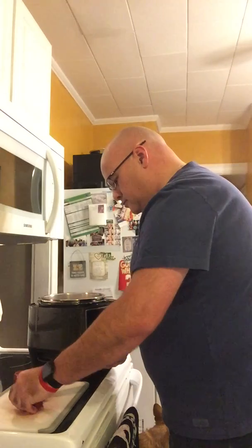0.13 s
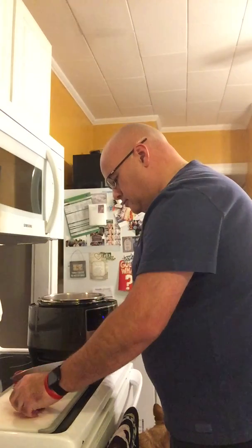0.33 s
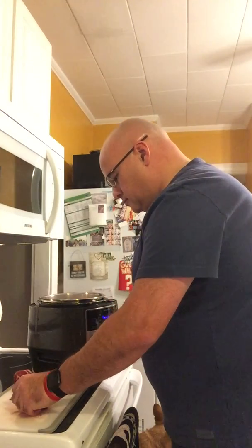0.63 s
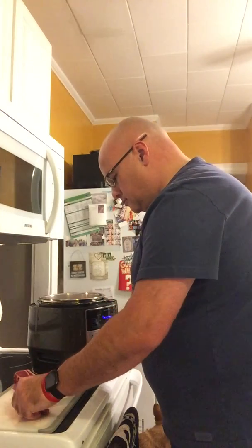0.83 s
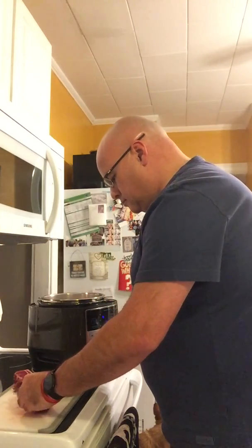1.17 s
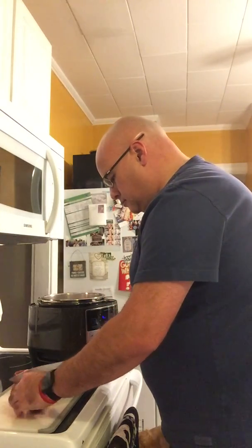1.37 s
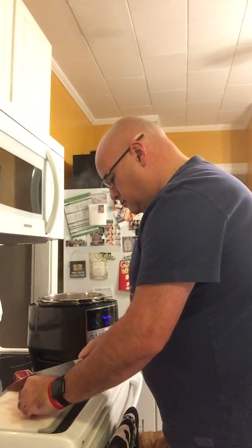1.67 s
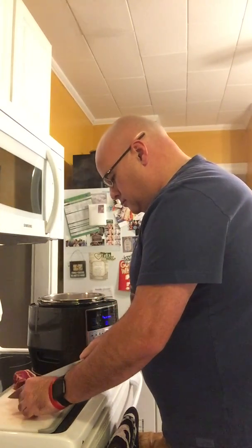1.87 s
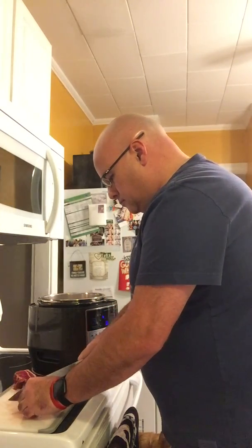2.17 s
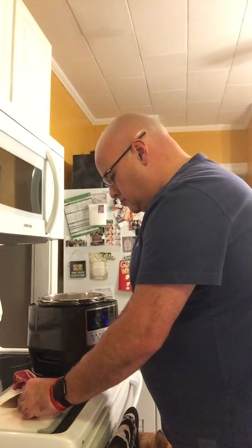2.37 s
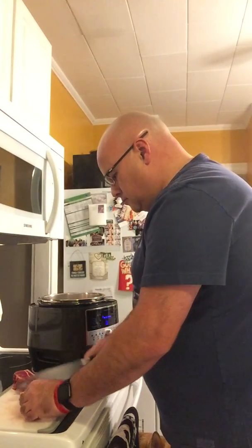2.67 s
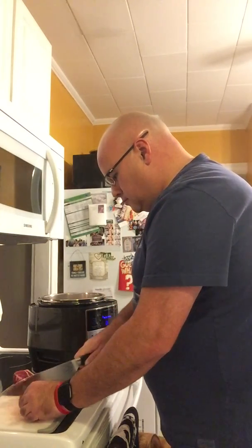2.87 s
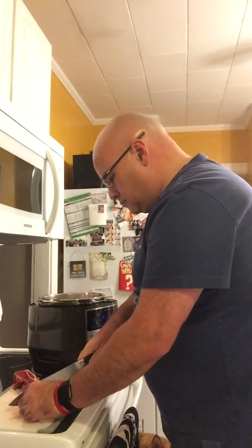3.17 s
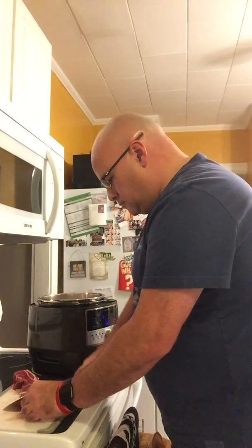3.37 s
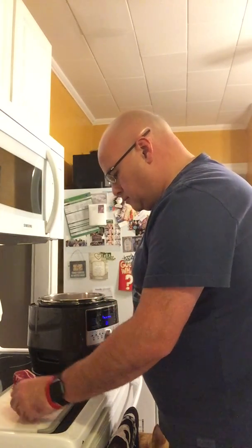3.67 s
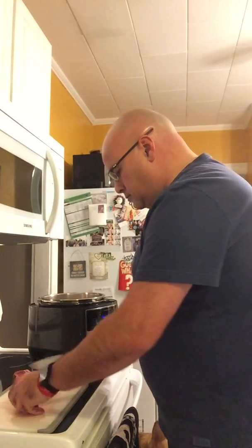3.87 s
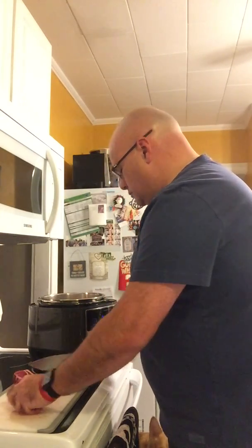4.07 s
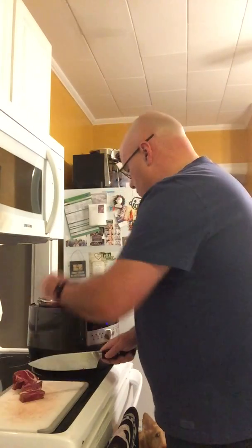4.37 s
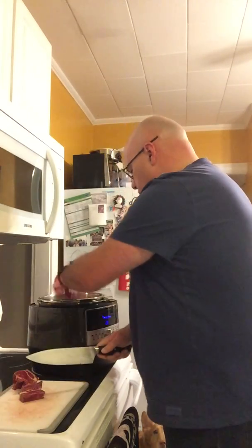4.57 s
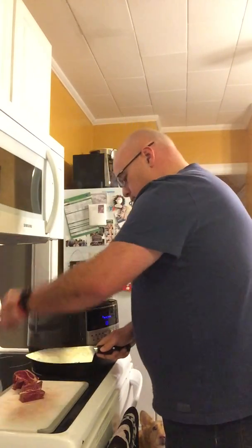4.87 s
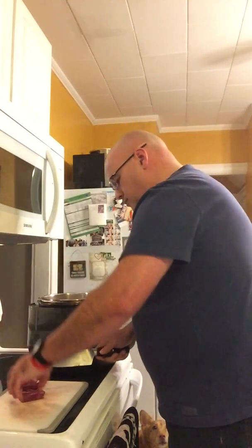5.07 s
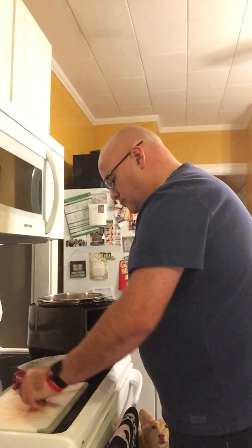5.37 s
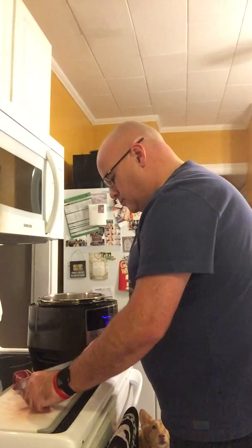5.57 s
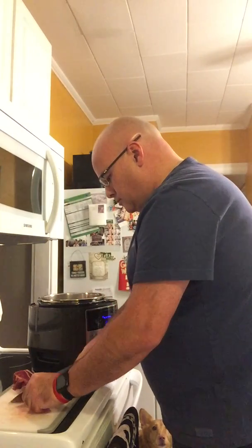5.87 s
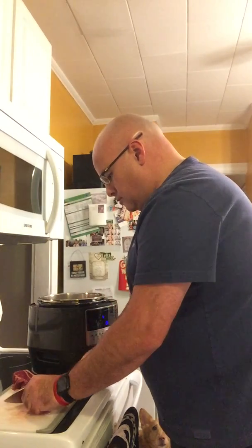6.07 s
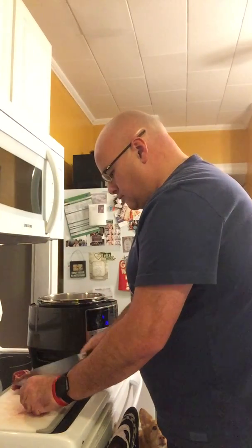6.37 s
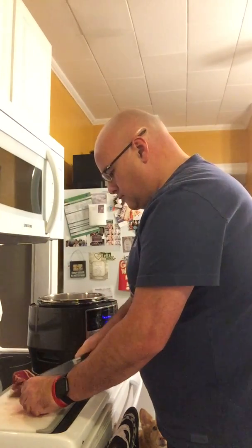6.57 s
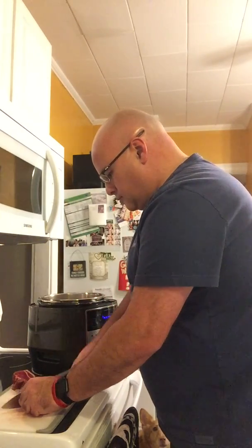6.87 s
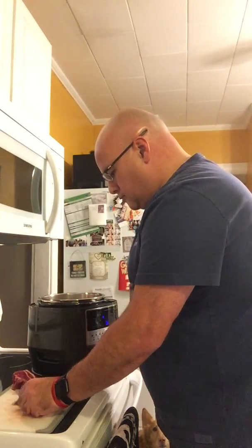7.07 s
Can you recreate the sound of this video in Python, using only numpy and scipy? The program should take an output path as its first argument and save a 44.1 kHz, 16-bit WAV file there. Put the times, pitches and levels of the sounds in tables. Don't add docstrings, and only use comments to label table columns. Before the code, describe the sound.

A chef's knife cuts raw meat on a plastic board, five uneven knocks, one small metal rattle, faint fan hiss and simmer behind.

```python
import sys
import numpy as np
from scipy import signal
from scipy.fft import rfft, irfft
from scipy.io import wavfile
from scipy.ndimage import uniform_filter1d

SR = 44100
rng = np.random.default_rng(int(sys.argv[2]) if len(sys.argv) > 2 else 0)


def put_to_file(sound):
    columns = np.atleast_2d(sound).T
    safe = np.clip(columns, -1, 1)
    whole_steps = np.round(safe * 32767)
    wavfile.write(sys.argv[1], SR, whole_steps.astype(np.int16))


def invert_db(level):
    return 10 ** (np.asarray(level, dtype=float) / 20)


N = 317961

# t/s, board level/dB, counter level/dB, contact/ms, room level/dB
KNOCKS = [
    (0.8344, -5.5, -26, 0.14, 11.5),
    (2.3788, -8.5, -33, 0.35, 12.5),
    (3.412, -25.5, -35.5, 0.99, 13),
    (6.016, -31.5, -46, 0.47, 17),
    (6.9939, -18, -31.5, 0.34, 13.5),
]
# delay/s, level/dB
BOUNCES = [
    (0, -12),
    (.0013, 4),
    (.0038, 0),
    (.0058, 4.5),
    (.011, -6),
    (.021, -18.5),
    (.032, -7.5),
]
# f/Hz, level/dB
BOARD_MODES = [(660, -1.5), (800, -7), (890, -4.5), (1030, 3.5), (1205, 7), (1340, 6.5), (1480, -7),
               (1720, -1.5), (1980, 0.5), (2310, 3.5), (2650, 0.5), (2850, 3.5), (3200, -11), (3600, -28),
               (4000, -37), (4400, -38), (5000, -55), (5700, -15)]
# f/Hz, level/dB, t60/s
COUNTER_MODES = [(100, -18, 0.53), (151, 1, 0.06), (185, 1, 0.29), (238, -9, 0.14), (238, -18, 0.13),
                 (280, 9.5, 0.16), (378, -7, 0.032), (417, 5, 0.061), (484, -19, 0.039)]
# f/Hz, level/dB
BLOW_SPECTRUM = [(90, -38), (150, -3), (400, -3.5), (700, -5.5), (1250, -1.5), (1600, -10.5), (2700, -9),
                 (3500, -17.5), (4500, -24.5), (8000, -21), (15000, -34)]
# end t/s, length/s, hiss level/dB, body level/dB
STROKES = [(0.798, 0.065, -62, -72), (.837, 0.017, -48, -43), (2.379, 0.096, -54.5, -50.5),
           (2.632, 0.048, -64, -77), (3.4, 0.056, -50.5, -49.5), (5.973, 0.06, -60, -60),
           (6.012, 0.043, -58.5, -50.5), (6.27, .04, -66.5, -59), (7.001, .11, -54, -50),
           (7.2, 0.09, -64.5, -78)]
# f/Hz, level/dB per Hz
RUB_SPECTRUM = [(880, -42), (1500, -21), (1940, -1), (2110, -9), (2840, -11.5), (4120, -15), (6660, -16.5),
                (10400, -26.5), (12400, -22), (15600, -35)]
# t/s, hold/s, level/dB, f/Hz
SHOVES = [(1.035, 0.025, -41.5, 275), (1.646, 0.087, -60.5, 270), (2.211, 0.16, -51, 284),
          (2.351, .02, -47, 300), (3.372, 0.047, -49, 292), (3.412, 0.049, -44.5, 300),
          (5.965, .045, -49.5, 256), (6.014, 0.021, -42, 280), (6.936, 0.062, -50.5, 290),
          (6.999, 0.036, -37.5, 310)]
# t/s, hold/s, level/dB, f/Hz
ROCKS = [
    (3.408, 0.0046, -38, 636),
    (6.016, .01, -67, 645),
    (6.991, 0.011, -39, 640),
]
# t/s, level/dB, f/Hz, t60/s
PUSHES = [(0.274, -57.5, 190, 0.3), (0.713, -50, 183.5, 0.19), (1.464, -58.5, 185, 0.4),
          (1.955, -52, 187, 0.24), (1.958, -52, 281, 0.23), (2.33, -43, 151, .15), (2.392, -42, 100, .22),
          (3.1, -56, 58, 0.14), (3.736, -61, 281, 0.13), (4.015, -64, 203, 0.19), (4.799, -57.5, 120, 0.1),
          (4.81, -57, 212, 0.12), (5.79, -62, 185, 0.19), (6.497, -62.5, 184, 0.11),
          (6.724, -41.5, 172, 0.031), (6.742, -40.5, 186.4, 0.22), (6.022, -42, 248, 0.15)]
# t/s, level/dB, f/Hz, t60/s
TICKS = [(.62, -54, 8300, 0.0046), (.786, -48, 13000, .01), (.807, -41, 7030, 0.0087),
         (.808, -45, 14000, .006), (2.4, -36, 3620, 0.036), (3.485, -60, 3150, 0.025),
         (2.623, -56, 6650, 0.083), (3.08, -59, 13000, .004), (3.612, -48, 12100, .003),
         (3.646, -59, 8140, .05), (4.101, -51, 3440, .03), (.515, -53, 710, 0.17), (6.2, -54, 2480, 0.079),
         (6.27, -46, 2000, 0.069), (6.291, -52, 2740, 0.046)]
# hold/s, metal level/dB, board level/dB
RATTLE = (0.035, -46.5, -44)
# t/s, metal level/dB, board level/dB
RATTLE_HITS = [
    (1.024, -50, -30),
    (1.034, -49, -45),
    (1.043, -27, -28.5),
    (1.056, -42, -46),
    (1.08, -50, -30),
    (1.11, -44.5, -50),
    (1.154, -47, -60),
]
# f/Hz, level/dB, t60/s
METAL_MODES = [(3670, -8, 0.06), (4470, -2, 0.05), (5300, -2.5, 0.058), (5960, -5, 0.033), (6900, 1, 0.035),
               (7280, -1, .05), (7200, 3, 0.055), (7720, 1.5, 0.046), (8900, -15, .07), (9920, -13, 0.054),
               (10400, -19, 0.035), (11720, -5, 0.051), (12100, -16, 0.061), (13000, -21, .05),
               (13900, -16, .05), (15300, -15, .04)]
# f/Hz, level/dB per Hz
AIR_SPECTRUM = [(40, -28), (60, 0), (96, -2), (150, -8), (400, -9.5), (740, -9.5), (1000, -10), (1600, -4),
                (2300, -3.5), (2900, -8), (3800, -13.5), (6000, -15.5), (9000, -22.5), (15600, -29.5)]
# t/s, level/dB
AIR_LEVEL = [(0.0, -56.5), (3.6, -57), (4.0, -58), (7.21, -59)]
# f/Hz, width/Hz, level/dB
DUCT_MODES = [(945, 87, -64), (1435, 18.4, -58), (1866, 19, -62.5), (2408, 160, -65), (5600, 200, -76)]
# t/s, level/dB
DRAUGHT_LEVEL = [(0, -69.5), (1.3, -71), (2.6, -76.5), (4.0, -75.5), (5.0, -67), (5.8, -74), (7.21, -71.5)]
# t/s, level/dB
RUMBLE_LEVEL = [(0.0, -79), (1.05, -70.5), (2.7, -80), (3.5, -76), (4.4, -80), (6.7, -82), (7.21, -65)]
# f/Hz, t60/s
ROOM_T60 = [(100, 0.45), (300, 0.33), (1000, 0.46), (3000, 0.46), (8000, 0.25)]
# f/Hz, width/Hz, level/dB
MIC_DIP = (10500, 170, -6)

BOARD_T60_S = .032
CRACK_DB, CRACK_DB_PER_DB = -15.5, 1.56
STROKE_FROM_DB, STROKE_FALL_DB_PER_S = -17.5, 496
SHOVE_RISE_S, SHOVE_FALL_DB_PER_S = 0.013, 273
PUSH_SWELL_S = 0.0078
RATTLE_S, RATTLE_RISE_S, RATTLE_FALL_DB_PER_S = 1.024, 0.0084, 262
SIMMER_DB, BUBBLES_PER_S, BUBBLE_HZ = -63, 200, (800.6, 4504)
NOTE_WAVER_DB, RUMBLE_LUMPS_DB = 4.5, 4
MIC_LOW_HZ = 65


def knock(board_db, counter_db, contact_ms, room_db):
    contacts = np.zeros(SR // 20)
    for delay_s, db in BOUNCES:
        add(contacts, delay_s * rng.uniform(.97, 1.03), invert_db(db) * blow(contact_ms))
    board = signal.fftconvolve(contacts, ring(board_modes(), spread_db=1.2))
    counter = signal.fftconvolve(contacts, ring(COUNTER_MODES, spread_db=2.5))
    counter = band(counter, 110, 3000)
    t = np.arange(len(board)) / SR
    crack = band(rng.standard_normal(len(t)), 1960, 4170) * invert_db(-60 * t / 0.095)
    dry = invert_db(board_db) * board / abs(board).max()
    dry += invert_db(counter_db + 1.5) * counter / abs(counter).max()
    dry += invert_db(CRACK_DB + CRACK_DB_PER_DB * board_db) * crack
    dry = np.pad(dry, (0, SR // 4))
    pulse = np.convolve(click(BLOW_SPECTRUM), blow(contact_ms))
    pulse = np.pad(pulse, (0, len(dry) - len(pulse)))
    return dry + invert_db(board_db + room_db) * room(pulse)


def blow(contact_ms):
    size = max(contact_ms, .05) * SR / 1000
    force = np.sin(np.pi * (np.arange(int(size) + 1) + .5) / (size + 1))
    return force / force.sum()


def board_modes():
    return [(hz * rng.uniform(.98, 1.02), db, BOARD_T60_S * np.sqrt(1000 / hz)) for hz, db in BOARD_MODES]


def strokes():
    grain = invert_db(2.6 * evened(uniform_filter1d(rng.standard_normal(N), size=60)))
    hiss = coloured(lambda hz: read(RUB_SPECTRUM, hz), patchy_db=1.5, swell_db=0) * grain
    hiss /= np.std(band(hiss, 3800, 13000))
    body = evened(signal.fftconvolve(rng.standard_normal(N) * grain, ring(board_modes()))[:N])
    out = np.zeros(N)
    for end_s, length_s, hiss_db, body_db in STROKES:
        pressure = swell(end_s, length_s, 0, 0, STROKE_FALL_DB_PER_S, STROKE_FROM_DB)
        out += (invert_db(hiss_db) * hiss + invert_db(body_db) * body) * pressure
    return out


def shoves():
    out = np.zeros(N)
    for s, hold_s, db, hz in SHOVES + ROCKS:
        slips = (rng.random(SR) < 2000 / SR) * rng.standard_normal(SR)
        at = round(s * SR) - SR // 4
        gain = swell(s, SHOVE_RISE_S, hold_s, db, SHOVE_FALL_DB_PER_S)[at:at + SR]
        groan = evened(resonate(resonate(slips, hz, .7 * hz), hz, .7 * hz))
        add(out, at / SR, groan[:len(gain)] * gain)
    return out * invert_db(-3.5)


def pushes():
    out = np.zeros(N)
    for s, db, hz, t60_s in PUSHES:
        thud = ring([(hz, 0, t60_s), (1.264 * hz, -12, t60_s / 2)])
        thud = thud * (1 - np.exp(-np.arange(len(thud)) / (PUSH_SWELL_S * SR)))
        add(out, s, invert_db(db) * thud / abs(thud).max())
    return out


def ticks():
    out = np.zeros(N)
    for s, db, hz, t60_s in TICKS:
        modes = [(hz, 0, t60_s), (1.17 * hz, -6, t60_s / 2), (.85 * hz, -6, t60_s / 2)]
        add(out, s, invert_db(db) * ring(modes))
    return out


def rattle():
    small = (rng.random(N) < 2500 / SR) * rng.standard_normal(N) * invert_db(1.5 * rng.exponential(1, N))
    hold_s, loud_db, under_db = RATTLE
    shake = swell(RATTLE_S, RATTLE_RISE_S, hold_s, 0, RATTLE_FALL_DB_PER_S)
    grit = evened(band(small, 1700, 8200)) * shake * invert_db(loud_db)
    metal = evened(signal.fftconvolve(small * shake, ring(METAL_MODES))[:N]) * np.std(grit)
    under = evened(signal.fftconvolve(small, ring(board_modes(), factor=1.6))[:N])
    out = invert_db(-4.0) * grit + invert_db(-6.0) * metal + under * shake * invert_db(under_db)
    for s, metal_db, board_db in RATTLE_HITS:
        add(out, s, invert_db(metal_db - 5) * ring(METAL_MODES, spread_db=4.))
        add(out, s, invert_db(board_db) * ring(board_modes(), factor=1.4, spread_db=14.0))
    return out


def simmer(count=30):
    out, t = np.zeros(N), np.arange(SR // 16) / SR
    size = (rng.random(N) < BUBBLES_PER_S / SR) * invert_db(2.1 * np.minimum(rng.exponential(1, N), 3))
    kind = rng.integers(0, count, N)
    for k, hz in enumerate(np.geomspace(*BUBBLE_HZ, count)):
        tone = np.sin(2 * np.pi * hz * t * (1 + 0.19 * t))
        pop = tone * (t / .007) * np.exp(-t / 0.0072)
        out += signal.oaconvolve(size * (kind == k), pop * invert_db(read(AIR_SPECTRUM, hz)))[:N]
    return invert_db(SIMMER_DB) * evened(out)


def duct_db(hz):
    power = sum(invert_db(2 * db) / w / (1 + (2 * (hz - f) / w) ** 2) ** 2 for f, w, db in DUCT_MODES)
    return 10 * np.log10(power)


def air():
    hiss = coloured(lambda hz: read(AIR_SPECTRUM, hz), patchy_db=1.5, swell_db=.4)
    hiss *= invert_db(-59.5) / np.std(band(hiss, 790, 6200))
    whistle = coloured(duct_db, patchy_db=3.5, swell_db=.8)
    note = evened(resonate(resonate(rng.standard_normal(N), 453, 42), 453, 44))
    note = note * curve(DRAUGHT_LEVEL) * waver(NOTE_WAVER_DB, .2)
    rumble = evened(resonate(resonate(rng.standard_normal(N), 50, 21), 50, 21))
    rumble = rumble * waver(RUMBLE_LUMPS_DB, 0.18) * curve(RUMBLE_LEVEL) * invert_db(9.5)
    return (hiss + invert_db(-62.0) * whistle) * curve(AIR_LEVEL) / invert_db(-56.5) + note + rumble


def room(x, gap_s=.004):
    taps = np.zeros(SR // 2)
    at = np.arange(round(gap_s * SR), len(taps) - 20, 20)
    at = at + rng.integers(0, 20, len(at))
    taps[at] = rng.choice([-1., 1.], len(at))
    hz, t, z = signal.stft(taps, SR, nperseg=256)
    decay = invert_db(-60 * t / read(ROOM_T60, hz)[:, None])
    tail = signal.istft(z * decay, SR, nperseg=256)[1]
    return signal.fftconvolve(x, tail / np.linalg.norm(tail))[:len(x)]


def ring(modes, factor=1, spread_db=0.):
    t = np.arange(SR // 3) / SR
    hz, db, t60_s = np.transpose(modes)[:, :, None]
    chance = rng.standard_normal((len(modes), 2))
    sign = np.where(chance[:, 1:] > -.5, 1, -1)
    gain = sign * invert_db(db + spread_db * chance[:, :1] - 60 * t / t60_s)
    x = (gain * np.sin(2 * np.pi * hz * factor * t)).sum(0)
    return x / abs(x).max()


def click(points, size=2048):
    log_gain = read(points, abs(np.fft.fftfreq(size, 1 / SR))) * np.log(10) / 20
    pulse = np.fft.ifft(np.exp(np.conj(signal.hilbert(log_gain)))).real
    return pulse / np.linalg.norm(pulse)


def coloured(db_of_hz, patchy_db, swell_db):
    frames, hz = N // 256 + 5, np.fft.rfftfreq(1024, 1 / SR)
    a, b, patches = rng.standard_normal((frames, 513, 3)).T
    patches = uniform_filter1d(patches, size=10, axis=0)
    patches = evened(uniform_filter1d(patches, size=14, axis=1))
    flutter = evened(uniform_filter1d(rng.standard_normal(frames), size=20))
    level_db = db_of_hz(hz)[:, None] + patchy_db * patches + swell_db * flutter
    z = (a + 1j * b) * invert_db(level_db)
    return evened(signal.istft(z, nperseg=1024, noverlap=768)[1][:N])


def resonate(x, hz, width_hz):
    turn = np.exp(2j * np.pi * np.cumsum(hz * np.ones(len(x))) / SR)
    r = np.exp(-np.pi * width_hz / SR)
    return 2 * (turn * signal.lfilter([1 - r], [1, -r], x / turn)).real


def band(x, low_hz, high_hz):
    return signal.sosfilt(signal.butter(2, [low_hz, high_hz], "bandpass", fs=SR, output="sos"), x)


def swell(s, rise_s, hold_s, db, fall_db_per_s, from_db=-30):
    t = np.arange(N) / SR - s
    climb_db = np.interp(t, [-rise_s - .02, -rise_s, 0], [-80, from_db, 0])
    return invert_db(db + climb_db - fall_db_per_s * np.maximum(t - hold_s, 0))


def waver(depth_db, period_s):
    steps = rng.standard_normal(64)
    return invert_db(depth_db * np.interp(np.arange(N) / SR, np.arange(64) * period_s, steps))


def curve(rows):
    return invert_db(np.interp(np.arange(N) / SR, *np.transpose(rows)))


def read(points, hz):
    f, value = np.transpose(points)
    return np.interp(np.log(hz + 1), np.log(f + 1), value)


def evened(x):
    return x / np.sqrt(np.mean(x ** 2) + 1e-20)


def add(mix, s, sound):
    part = mix[round(s * SR):][:len(sound)]
    part += sound[:len(part)]


def scene():
    mix = np.zeros(N)
    for s, *how in KNOCKS:
        add(mix, s - .0013, knock(*how))
    thuds = pushes()
    mix += thuds + invert_db(-14) * room(thuds)
    small = strokes() + shoves() + ticks() + rattle()
    mix += small + invert_db(-6.0) * room(small)
    return (mix + simmer() + air())[None]


def roll_off(x):
    return signal.sosfilt(signal.butter(12, 15770, fs=SR, output="sos"), x)


def record(dry):
    hz = np.fft.rfftfreq(N, 1 / SR)
    dip_hz, width_hz, db = MIC_DIP
    x = irfft(rfft(dry) * invert_db(db / (1 + ((hz - dip_hz) / width_hz) ** 2)), N)
    x = signal.sosfilt(signal.butter(3, MIC_LOW_HZ, "highpass", fs=SR, output="sos"), x)
    return roll_off(x)


dry = scene()
out = record(dry)
put_to_file(out)
```